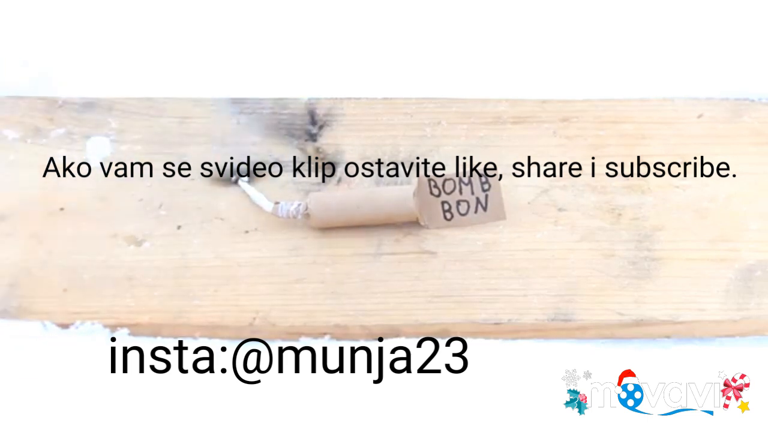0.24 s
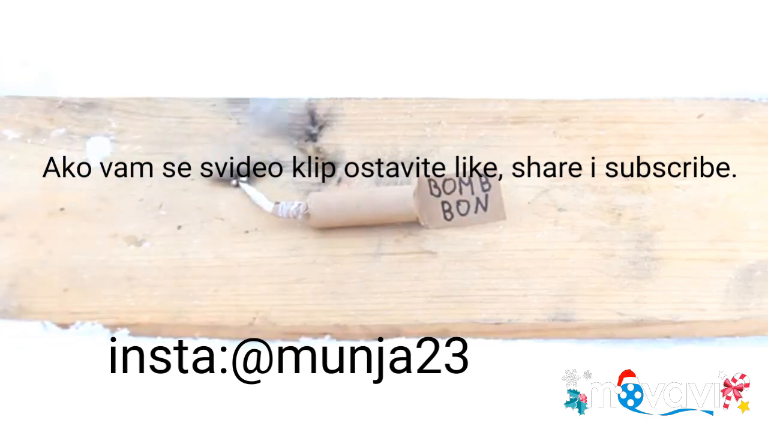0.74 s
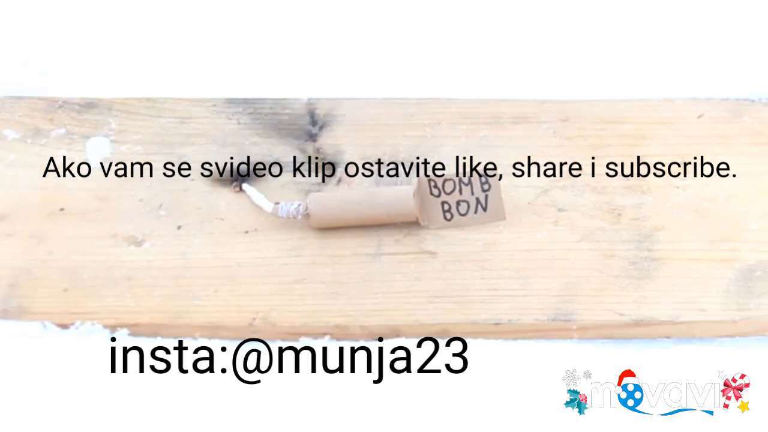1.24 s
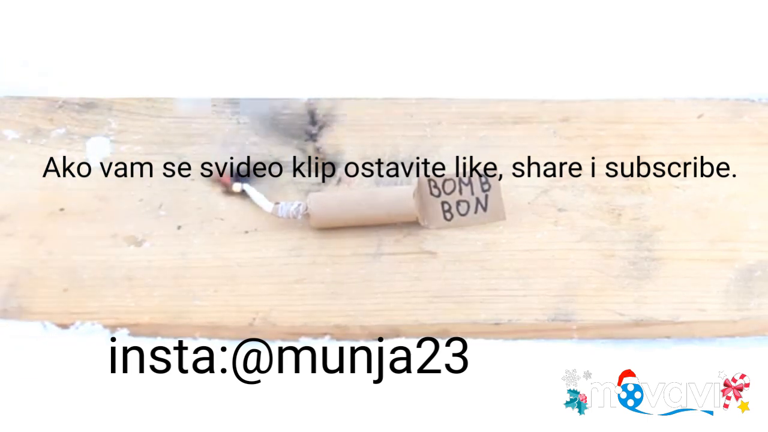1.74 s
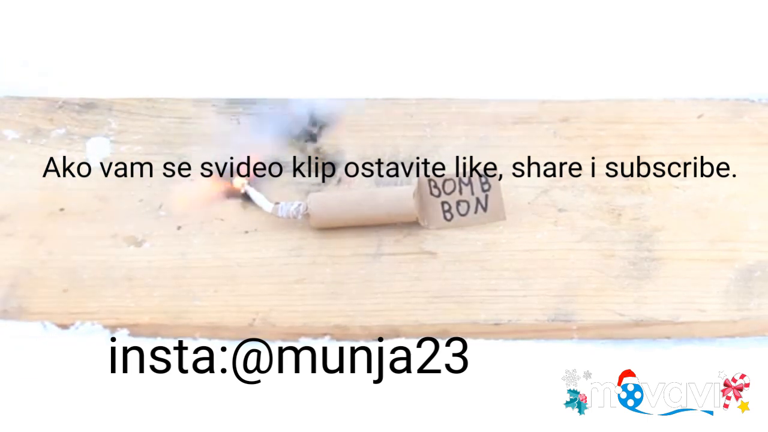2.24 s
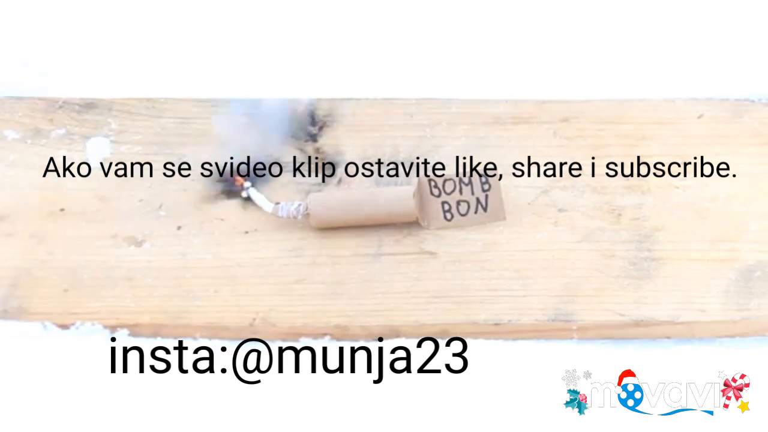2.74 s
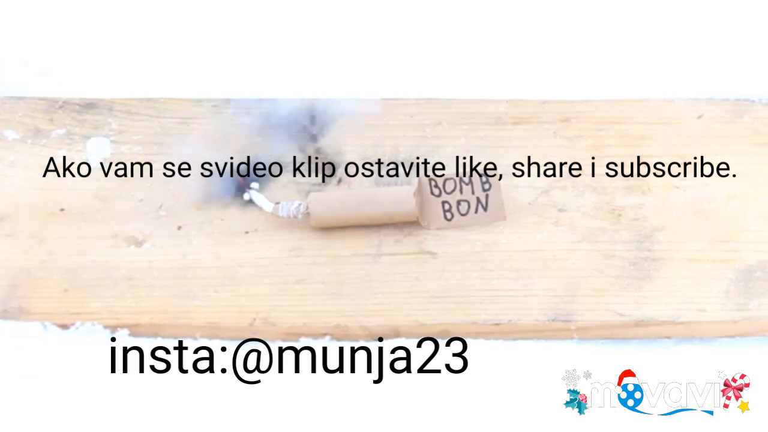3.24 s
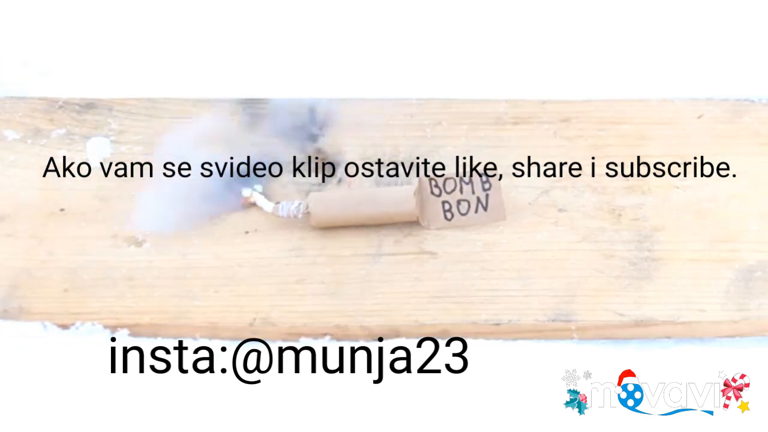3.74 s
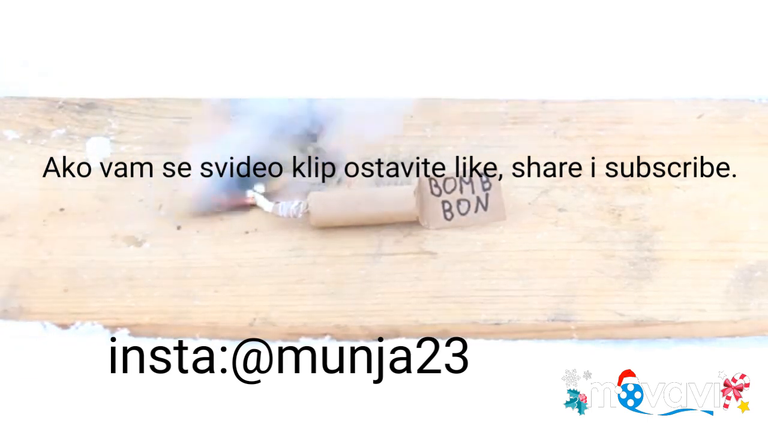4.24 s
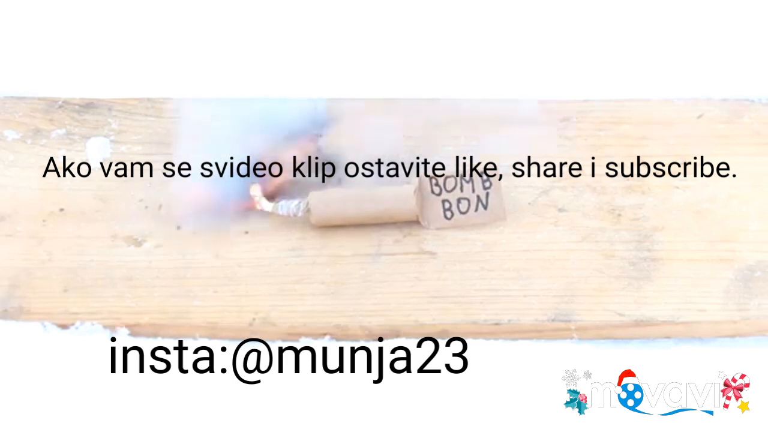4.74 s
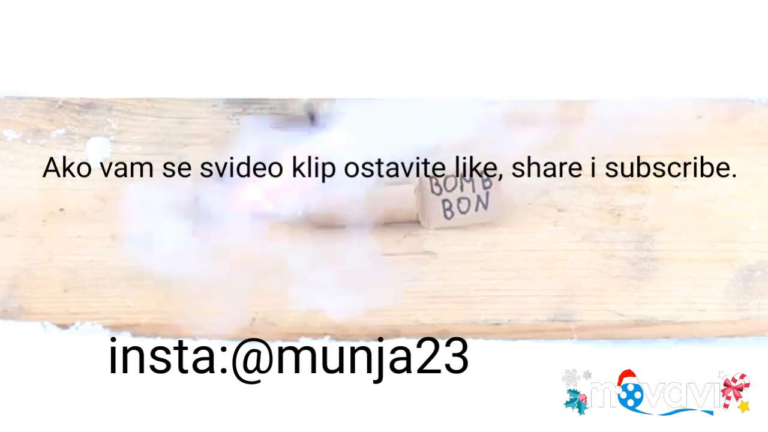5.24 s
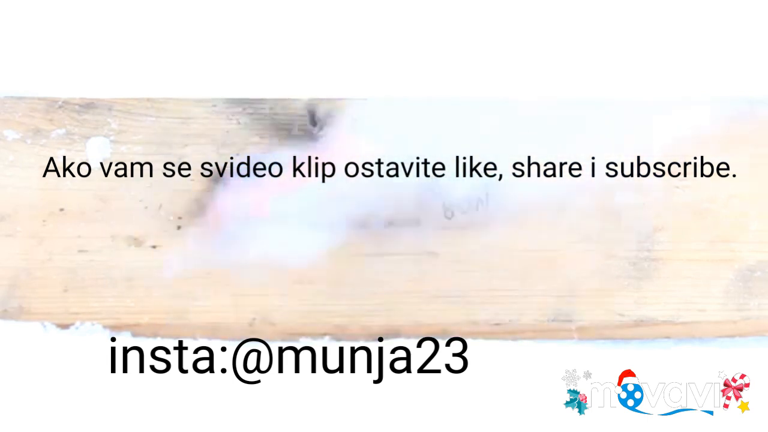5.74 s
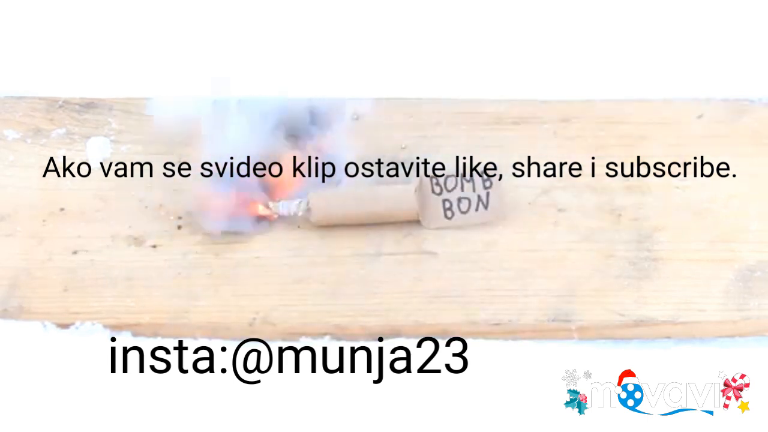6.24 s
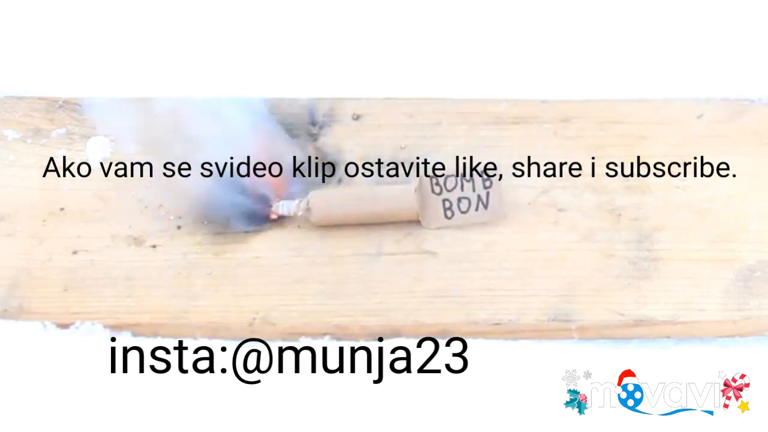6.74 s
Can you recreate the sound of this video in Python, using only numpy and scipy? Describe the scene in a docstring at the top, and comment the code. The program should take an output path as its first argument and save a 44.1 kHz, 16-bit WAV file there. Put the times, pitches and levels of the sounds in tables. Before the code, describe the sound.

A burning fuse hisses brightly over a soft fluttering flame, with small snaps, wind bumps and low thumps as the jet grows stronger outdoors.

```python
"""A firework fuse burns for seven seconds on a wooden board outdoors, close to a single microphone.
At first gas jets from the cord as a modest bright hiss (noise with tiny grains) over a softly roaring flame
(lumpy low noise), with gusts rumbling on the microphone. Between one and two seconds the flame whooshes and
snaps click (short ringing modes). Near three seconds the jet grows and low thumps crowd in (short
wavelets); later the hiss chokes, and near the end strong gusts return with one more heavy thump."""
import sys
import numpy as np
from scipy import signal
from scipy.io import wavfile

SR = 44100
rng = np.random.default_rng(int(sys.argv[2]) if len(sys.argv) > 2 else 0)


def magnitude_from_level(level_db):
    """Linear magnitude for a level in decibels (20 dB per decade)."""
    exponent = np.asarray(level_db, float) / 20
    return 10 ** exponent


def transcribe(u):
    """Save the signal u as a 16-bit wav file named by the first command-line argument.

    u: samples, shape (n,) or (channels, n), limited to [-1, 1]; the rate is SR.
    q: integer samples, one column per channel.
    """
    v = np.clip(np.atleast_2d(u).T, -1, 1)
    q = np.round(v * 32767).astype(np.int16)
    wavfile.write(sys.argv[1], SR, q)


N = 307818

# Jet of gas as the cord burns down: time_s, level_db (before the gain in jet()),
# treble_opening_db (before each band takes its share)
JET_COURSE = [(0.0, -39, -2), (0.3, -38, -0.5), (0.6, -37, -2), (0.9, -35.5, -1.5), (1.15, -36.5, -2.5),
              (1.45, -39.5, -1), (1.75, -41, -0.5), (1.92, -36, -1.5), (2.3, -35.5, -2), (2.65, -34.5, 0.5),
              (3.05, -31, -1), (3.5, -32.5, -0.5), (4.0, -31, -0.5), (4.3, -32.5, 0.5), (4.65, -33.5, 2),
              (5.2, -31, 2), (5.45, -29.5, -1), (5.8, -29.5, 0.5), (6.15, -31, 0), (6.33, -29, 1.5),
              (6.6, -30, -0.8), (6.98, -30.5, 0.5)]
# Colour of the jet: pitch_hz, density_db (per Hz, relative)
JET_SPECTRUM = [(300, -22), (700, -9.5), (1500, -3.5), (2300, -2.5), (3100, 1), (4500, 0), (5900, -1.5),
                (7200, -0.5), (8600, -2), (10300, -3), (12000, -2), (14000, -2), (17000, -4.5)]
# How far each pitch follows the treble opening: pitch_hz, share (no unit)
TREBLE_SHARE = [(4000, 0.0), (7000, 0.69), (8800, 0.93), (10500, 1.7), (12500, 1.35), (14500, 1.4)]
# Jet chokes for a moment: middle_s, length_s (between the 1/e points), level_lost_db,
# treble_opening_lost_db (negative is a gain)
JET_CHOKES = [(.21, 0.039, 2, 0), (.36, .05, 4, 2), (.51, 0.083, 3, -0.5), (.705, .14, 5.5, -1),
              (1.565, 0.044, 3.5, -1.5), (2.0, 0.078, 4, -1), (2.33, 0.059, -1.5, 4), (2.43, .04, 2.5, 0.5),
              (2.52, .04, -3.5, 4), (2.9, 0.15, 3, 0.5), (3.265, 0.12, 3.5, 0), (4.1, .04, 2, -2.5),
              (4.545, 0.049, 1, 4), (4.96, .05, -0.5, 2.5), (5.355, 0.068, 3.5, 1.3),
              (5.398, 0.042, 1.5, 2.5), (5.515, 0.15, 4.5, 6.5), (5.722, 0.03, -0.5, 2.5),
              (5.938, 0.055, 0.5, 7), (6.062, 0.094, 0.5, 4.5), (6.905, 0.11, 0.5, 0.5)]
# Jet spurts, with one slight dip: middle_s, length_s (between the 1/e points), level_gained_db,
# treble_opening_gained_db (negative is a loss)
JET_SPURTS = [(.135, 0.041, 3, 2.5), (.45, 0.037, 2, -0.5), (1.05, 0.055, -0.5, -1), (1.40, 0.089, 3.5, -1),
              (2.19, .05, 3.5, -1), (2.72, 0.048, 3.5, -1), (4.415, .06, 3.5, -0.8), (4.76, 0.1, 5, -2),
              (5.005, 0.033, 1.5, -0.5), (5.288, 0.033, 1, -2.5), (5.77, 0.072, 3, -2.5),
              (6.83, .05, 1, -3)]
# Steady flame: time_s, roar_db (rms before tilt), tilt_db_per_octave
FLAME_COURSE = [(0.0, -38.5, -1), (0.5, -43.5, 1), (1.0, -38.5, 0.5), (2.3, -38.5, -3), (2.9, -43.5, 0.5),
                (3.6, -41, -1.5), (4.2, -41, -0.5), (4.7, -42.5, 2.5), (5.4, -39, 1), (5.7, -38.5, 4),
                (6.5, -40.5, 3.5), (6.98, -44.5, 0)]
# Flame flares up with a whoosh: crest_s, roar_db (rms before tilt), rise_s, fall_s (to 1/e of the power),
# tilt_db_per_octave
FLAME_FLARES = [(1.06, -31.5, 0.036, 0.022, 2.5), (1.125, -35.5, 0.027, 0.047, 1),
                (1.39, -27, 0.069, 0.052, -0.2), (1.745, -31, .11, 0.043, -0.5),
                (2.1, -34, 0.07, 0.083, -4), (2.42, -34, 0.027, .06, -0.5), (2.61, -32.5, 0.088, 0.05, -3),
                (3.155, -38, 0.11, .05, -2), (4.81, -39.5, 0.021, 0.047, 2.5),
                (5.48, -35.5, .04, 0.047, -3.5), (6.7, -44, 0.053, .03, 8)]
# Colour of the flame's roar: pitch_hz, density_db (per Hz, relative)
ROAR_SPECTRUM = [(120, -16.5), (230, -7.5), (400, -4), (570, -2), (800, -4.5), (1300, -4), (1900, -8.5),
                 (3500, -16), (6000, -24)]
# Low thumps: gas pockets letting go, the deepest ones wind bumping the microphone:
# crest_s, peak_db, pitch_hz, length_cycles
THUMPS = [(0.0817, -30, 72.6, 0.48), (1.036, -27, 460, 0.77), (1.1171, -18.5, 312, 0.65),
          (1.581, -28.5, 217, 0.56), (1.861, -33, 87, 0.64), (2.462, -23, 239, 0.49),
          (3.0096, -31, 175, 0.38), (3.062, -28, 179, 0.45), (3.118, -11, 278, 0.3),
          (3.151, -24, 189, 0.31), (3.1877, -25, 643, 0.73), (3.5208, -24.5, 366, 0.43),
          (3.5342, -19, 418, 0.4), (3.572, -20, 240, 0.42), (3.638, -26, 467, 0.45),
          (3.6474, -19, 792, 0.33), (3.791, -24, 382, 0.69), (3.814, -28, 68, 0.37),
          (3.8396, -25.5, 150, 0.54), (3.878, -28, 277, 0.34), (3.9193, -16, 273, 0.58),
          (3.979, -25.5, 208, 0.5), (4.1344, -28, 271, 0.65), (4.2542, -25.5, 276, 0.49),
          (4.5, -32.5, 200, 0.58), (4.588, -32, 429, 0.5), (4.661, -32.5, 225, 0.5), (4.79, -28, 425, 0.63),
          (5.824, -24, 171, 0.71), (6.278, -28, 65, 0.48), (6.419, -28.5, 70, 0.57),
          (6.45, -27.5, 107, 0.34), (6.6961, -13.5, 169, 0.37), (6.948, -27, 76, 0.19)]
# Powder grains snapping: start_s, strength_db (before mode levels and the trim in snaps()),
# brightness_db_per_octave
POWDER_SNAPS = [(.06, -34, 2.0), (0.789, -26, 2), (1.1924, -18, 6), (1.1957, -21, 3.0), (1.4273, -19, 3),
                (1.58, -27, -6), (5.385, -25, 1.5)]
# Short modes of cord and board: pitch_hz, level_db (relative), t60_s
SNAP_MODES = [(1360, 1.5, 0.0084), (2740, 6, .005), (4600, 4, 0.0022)]
# Gusts on the microphone: crest_s, level_db (rms), rise_s, fall_s (to 1/e of the power)
WIND_GUSTS = [(.09, -40.5, 0.066, 0.055), (.27, -44, .08, 0.031), (1.2, -57, 0.12, .12),
              (1.58, -49.5, .06, 0.16), (1.86, -41.5, 0.038, .1), (2.57, -53, 0.16, 0.055),
              (3.12, -44, .06, .06), (3.4, -47, 0.027, .03), (3.57, -44, 0.044, 0.069),
              (3.825, -36, 0.042, 0.076), (4.0, -43, .07, .05), (4.2, -52, .08, .06),
              (4.5, -52, 0.055, 0.14), (4.85, -46.5, 0.055, 0.05), (5.37, -50, .03, 0.099),
              (5.82, -37.5, 0.042, 0.056), (5.96, -38.5, .05, 0.027), (6.12, -45, .09, .09),
              (6.29, -37.5, 0.037, .04), (6.43, -38, .03, 0.078), (6.7, -34.5, 0.052, 0.03),
              (6.82, -36.5, 0.045, 0.035), (6.95, -43, 0.032, .05)]
# Colour of wind on the microphone: pitch_hz, density_db (per Hz, relative)
RUMBLE_SPECTRUM = [(20, -3), (45, 1), (85, -4), (160, -10.5), (300, -21.5), (500, -45)]
# Colour of the outdoor air: pitch_hz, density_db (per Hz, relative)
AIR_SPECTRUM = [(20, 10), (45, -3), (100, 13), (250, 3), (600, 4)]


def rms_one(x):
    """Scale to rms 1."""
    return x / np.sqrt(np.mean(x ** 2) + 1e-20)


def in_time(rows):
    """Draw each column of a table as a curve with a value at every sample."""
    time_s, *columns = np.transpose(rows)
    return [np.interp(np.arange(N) / SR, time_s, column) for column in columns]


def at_hz(points, hz):
    """Read a spectrum on a log frequency axis."""
    pitch_hz, value = np.transpose(points)
    return np.interp(np.log(hz), np.log(pitch_hz), value)


def drift(rate_hz):
    """Slow chance movement of spread 1: noise at every 40th sample through two equal one-pole lowpasses."""
    r = np.exp(-2 * np.pi * rate_hz * 40 / SR)
    noise = rng.standard_normal(N // 40 + 2002)
    slow = signal.lfilter([1], [1, -2 * r, r * r], noise)[2000:]   # drop the filter's run-in
    return np.interp(np.arange(N) / 40, np.arange(len(slow)), rms_one(slow))


def bands(sources, low_hz, count):
    """Yield (centre Hz, quarter-octave band); neighbours are fed from unrelated sources."""
    edges = low_hz * 2 ** (np.arange(count + 1) / 4)
    for low, high, source in zip(edges, edges[1:], list(sources) * count):
        sos = signal.butter(2, [low, high], "band", fs=SR, output="sos")
        yield np.sqrt(low * high), signal.sosfilt(sos, source)


def turbulence(spectrum, low_hz, count, lumpy_db, patchy_db, rate_hz, tilt_db=0, pivot_hz=700):
    """Eddies as coloured noise: lumps shared by all bands, patches in each; rms 1 before the tilt."""
    lumps = lumpy_db * drift(rate_hz)
    noise = rng.standard_normal((2, N))
    flat, tilted = 0, 0
    for hz, band in bands(noise, low_hz, count):
        band = band * magnitude_from_level(at_hz(spectrum, hz) + lumps + patchy_db * drift(rate_hz))
        flat = flat + band
        tilted = tilted + band * magnitude_from_level(tilt_db * np.log2(hz / pivot_hz))
    return tilted / np.sqrt(np.mean(flat ** 2))


def swell(crest_s, level_db, rise_s, fall_s):
    """Power of a bell-shaped swell with its own rise and fall."""
    t = np.arange(N) / SR - crest_s
    width_s = np.where(t < 0, max(rise_s, .01), max(fall_s, .01))
    return magnitude_from_level(2 * level_db) * np.exp(-(t / width_s) ** 2)


def bumps(rows):
    """Flat-topped bumps in level and treble opening, summed in dB."""
    steepness = 3.1   # of the edges
    t = np.arange(N) / SR
    out = np.zeros((2, N))
    for middle_s, length_s, level_db, treble_db in rows:
        shape = np.exp(-np.abs(2 * (t - middle_s) / length_s) ** steepness)
        out += np.outer([level_db, treble_db], shape)
    return out


def jet_motion():
    """Level and treble opening of the jet: its slow course, spurts, chokes and unsteadiness."""
    flutter_db, treble_flutter_db, flutter_hz = 0.25, 0.5, 12
    unsteady = [flutter_db * drift(flutter_hz), treble_flutter_db * drift(flutter_hz)]
    return np.array(in_time(JET_COURSE)) + bumps(JET_SPURTS) - bumps(JET_CHOKES) + unsteady


def jet(level_db, treble_db):
    """Smooth jet noise with dense tiny grains; its treble opens and closes as the jet turns and chokes."""
    grains_per_s, grains_db = 500, -14   # grain level is relative to the smooth noise
    sizes = magnitude_from_level(2.1 * np.minimum(rng.exponential(1, (2, N)), 5))
    signs = rng.choice([-1, 1], (2, N))
    grains = rms_one(sizes * signs * (rng.random((2, N)) < grains_per_s / SR))
    gas = rng.standard_normal((2, N)) + magnitude_from_level(grains_db) * grains
    flutter = 0.74 * drift(19.0)
    steady, played = 0, 0
    for hz, band in bands(gas, low_hz=288.0, count=24):
        band = band * magnitude_from_level(at_hz(JET_SPECTRUM, hz) + flutter + 0.83 * drift(17.0))
        steady = steady + band
        played = played + band * magnitude_from_level(at_hz(TREBLE_SHARE, hz) * treble_db)
    return magnitude_from_level(level_db + 4.5) * played / np.sqrt(np.mean(steady ** 2))


def flame():
    """Flares add their power to the steady roar and lend it their colour."""
    roar_db, tilt_db = in_time(FLAME_COURSE)
    power = magnitude_from_level(2 * roar_db)
    coloured = power * tilt_db
    for *shape, flare_tilt_db in FLAME_FLARES:
        flare = swell(*shape)
        power = power + flare
        coloured = coloured + flare * flare_tilt_db
    mean_tilt_db = coloured / power   # weighted by power
    roar = turbulence(ROAR_SPECTRUM, low_hz=111.6, count=23, lumpy_db=1.4, patchy_db=1.5, rate_hz=46,
                      tilt_db=mean_tilt_db)
    return np.sqrt(power) * roar


def weak_thumps(count=24):
    """Weak thumps fall at random while the flame runs along the cord."""
    start_s, end_s, mean_peak_db, low_hz, high_hz = 2.95, 5.6, -36.5, 170, 478
    when, size, pitch = rng.random((count, 3)).T
    crest_s = start_s + (end_s - start_s) * when
    peak_db = mean_peak_db + 8.0 * (size - .5)
    pitch_hz = low_hz * (high_hz / low_hz) ** pitch
    return list(zip(crest_s, peak_db, pitch_hz, [.5] * count))


def thumps():
    """Each thump pushes the air once or twice: a wavelet that rises fast, sinks in pitch and dies slower."""
    out = np.zeros(N + 2000)
    offsets = np.arange(-1500, 1500)
    for crest_s, peak_db, hz, cycles in THUMPS + weak_thumps():
        turns = hz * offsets / SR
        width = max(cycles, .2) * np.where(turns < 0, .95, 1.15)
        bell = np.exp(-.5 * (turns / width) ** 2)
        wavelet = bell * np.cos(2 * np.pi * turns * (1 - 0.072 * np.clip(turns, -2, 2)))
        wavelet = wavelet + 0.47 * wavelet * np.abs(wavelet)   # strong pushes peak sharply, adding overtones
        wavelet = wavelet - bell * wavelet.sum() / bell.sum()   # no net push
        out[round(crest_s * SR) + offsets] += magnitude_from_level(peak_db) * wavelet / np.max(wavelet)
    return out[:N]


def snaps():
    """A click rings a few very short modes of cord and board, with new strengths each time."""
    start_s, strength_db, brightness_db = np.transpose(POWDER_SNAPS)
    at = np.round(start_s * SR).astype(int)
    spread_db = rng.normal(0, 2, (len(at), len(SNAP_MODES)))
    out = np.zeros(N)
    for k, (hz, level_db, t60_s) in enumerate(SNAP_MODES):
        tilt_db = brightness_db * np.log2(hz / 2500)
        clicks = np.full(N, 1e-18)   # inaudible floor
        clicks[at] = magnitude_from_level(strength_db + level_db + spread_db[:, k] + tilt_db - 5.5)
        r = magnitude_from_level(-60 / (t60_s * SR))
        w = 2 * np.pi * hz / SR
        out += signal.lfilter([0, np.sin(w)], [1, -2 * r * np.cos(w), r * r], clicks)
    return out


def wind():
    """Lumpy rumble on the microphone that swells with each gust."""
    calm_db = -60.5   # between gusts
    power = magnitude_from_level(2 * calm_db) + sum(swell(*gust) for gust in WIND_GUSTS)
    rumble = turbulence(RUMBLE_SPECTRUM, low_hz=17.5, count=19, lumpy_db=1.5, patchy_db=1.5, rate_hz=13)
    return np.sqrt(power) * rumble


def outdoor_air():
    """Faint, slowly wavering low noise of the open air behind the fuse."""
    level_db = -55.5   # rms
    return magnitude_from_level(level_db) * turbulence(AIR_SPECTRUM, low_hz=18.5, count=20, lumpy_db=2.0, patchy_db=2.5,
                                      rate_hz=2.5)


def scene():
    """Everything reaches one microphone, so both channels are alike."""
    fuse = jet(*jet_motion()) + flame() + thumps() + snaps()
    return np.tile(fuse + wind() + outdoor_air(), (2, 1))


def low_pass(x):
    """Removes everything above the highest recorded frequency."""
    return signal.sosfilt(signal.butter(12, 16300, fs=SR, output="sos"), x)


def record(dry):
    """A steep lowpass cuts the top, and a small constant offset rides along."""
    cutoff_hz, offset = 15050, .001   # offset as a share of full scale
    lowpass = signal.ellip(14, .3, 85, cutoff_hz, fs=SR, output="sos")   # .3 dB ripple, 85 dB stopband
    mix = signal.sosfilt(lowpass, dry) + offset
    return low_pass(mix)


dry = scene()
out = record(dry)
transcribe(out)
```